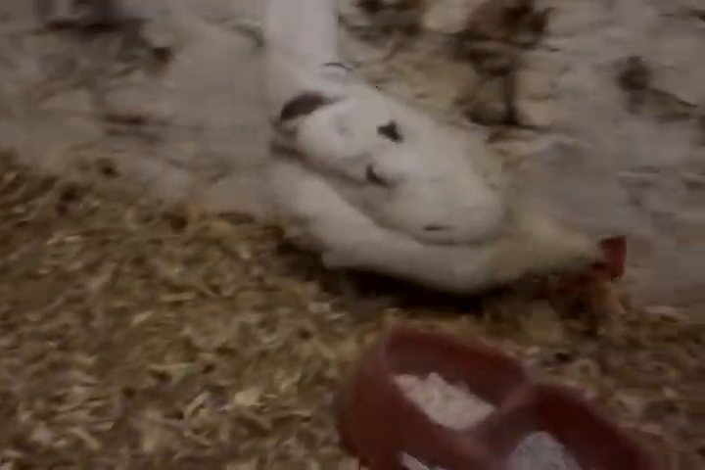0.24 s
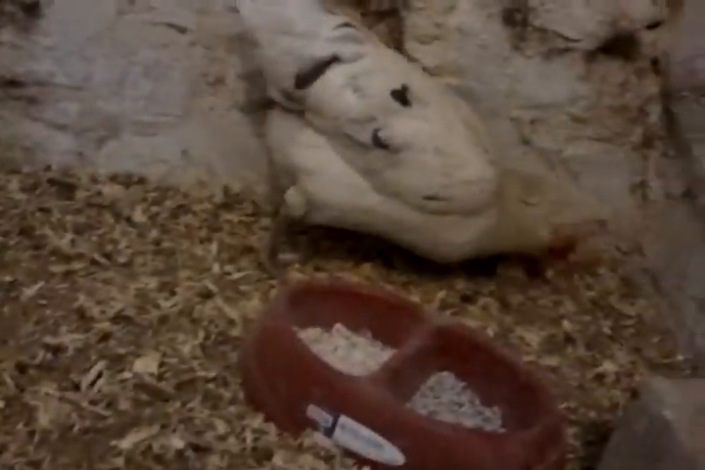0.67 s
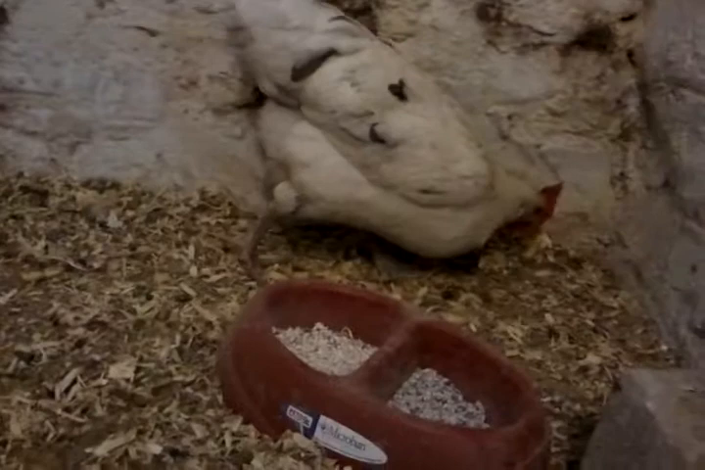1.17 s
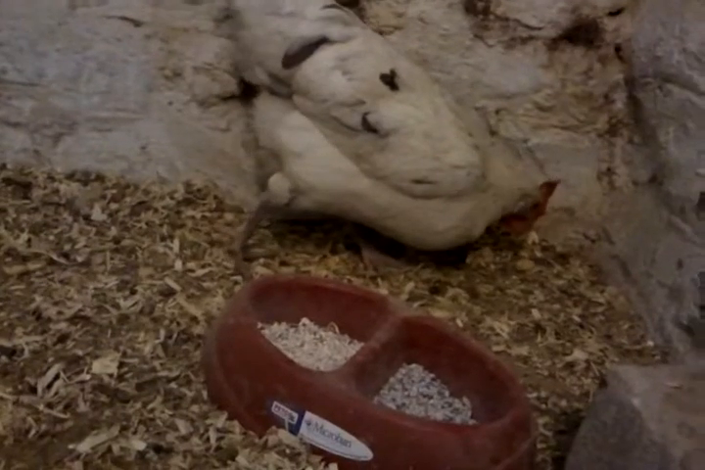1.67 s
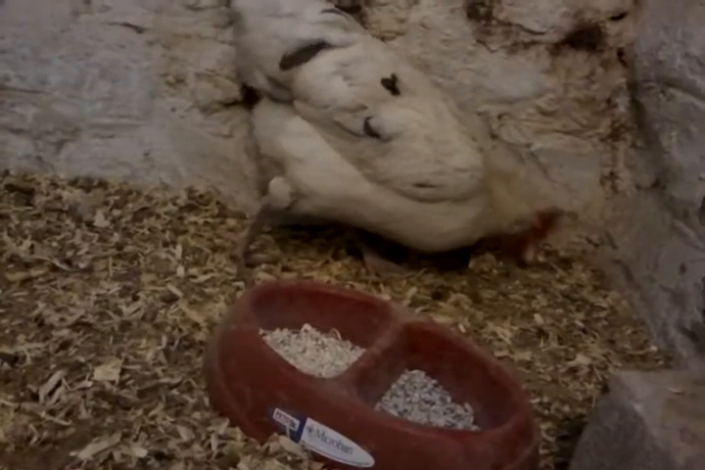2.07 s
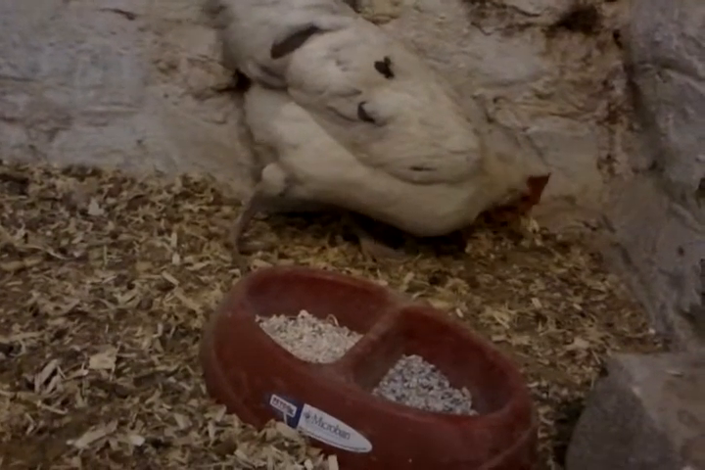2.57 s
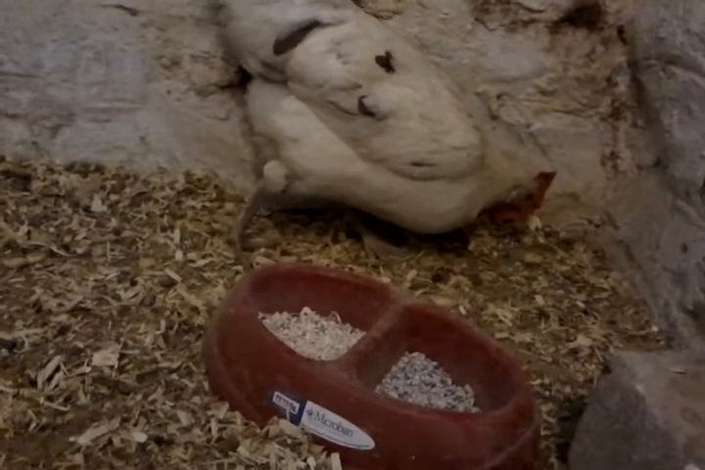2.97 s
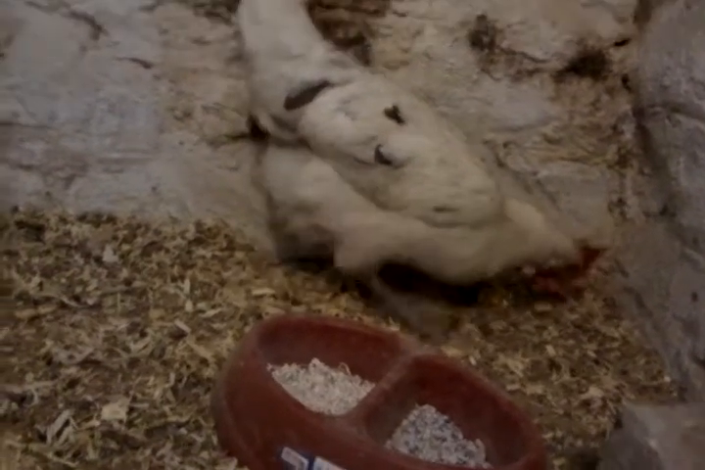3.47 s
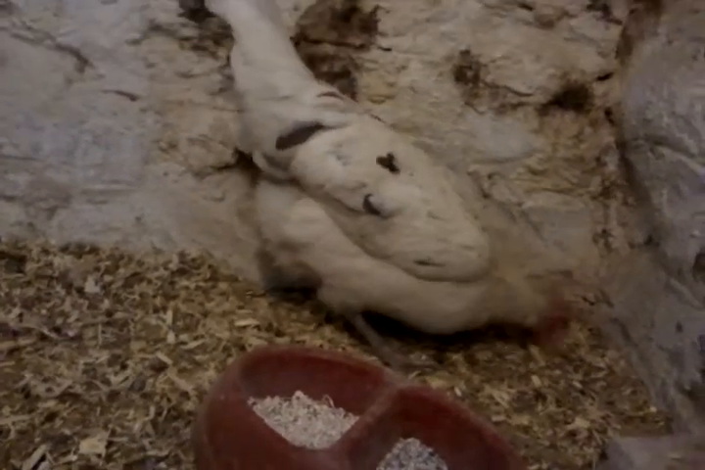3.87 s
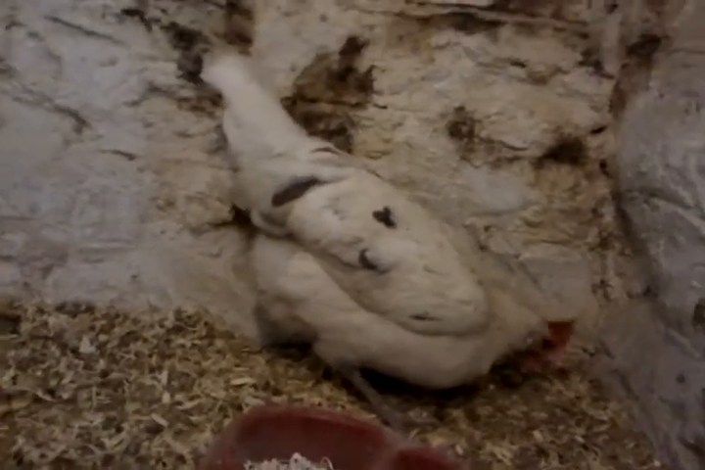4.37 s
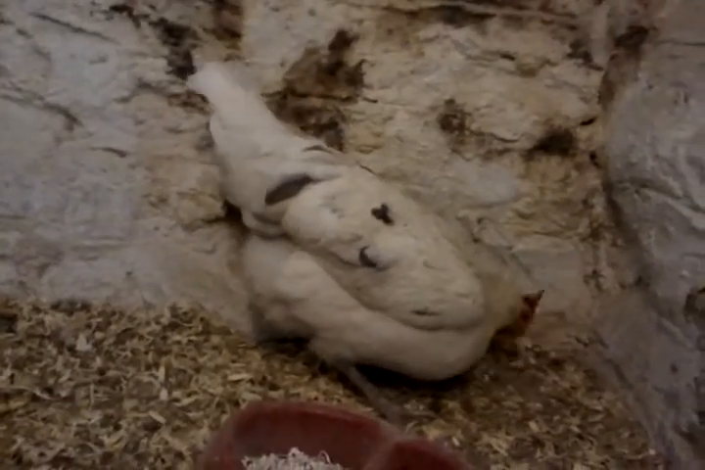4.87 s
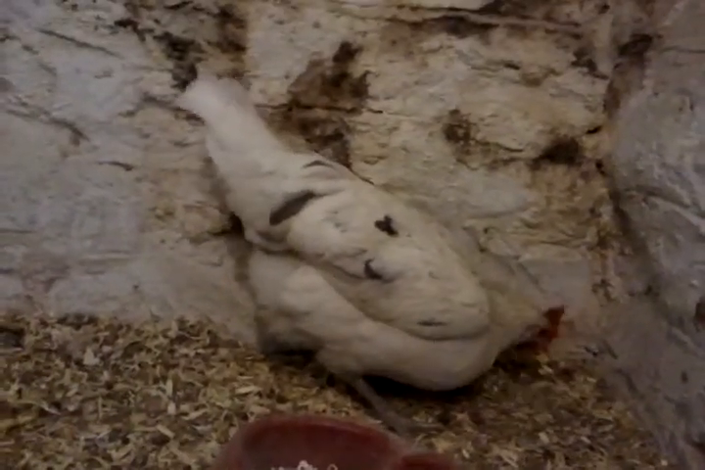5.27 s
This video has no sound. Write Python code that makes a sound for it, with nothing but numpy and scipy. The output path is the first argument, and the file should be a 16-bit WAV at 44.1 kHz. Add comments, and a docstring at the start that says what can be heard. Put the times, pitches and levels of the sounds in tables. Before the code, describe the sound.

A hen pecks at food in a small stone coop, sharp bright beak clicks in quick irregular clusters with dry litter crunches and short echoes.

```python
"""Beak clicks come in quick clusters: a hen pecks at nuts in a small stone coop, close to a camera.
Each click is three short rings and a broader crack, and the walls answer it with echoes and a tail.
Dry litter crunches in dense grains under the beak; some moments add a dull thud or a hollow knock.
Below lie a low outdoor rumble of shaped noise and a wavering hum that swells.
The camera adds shaped hiss, a faint tick at a fixed pace and, at times, a thin whine of three tones."""
import sys
import numpy as np
from scipy import signal
from scipy.fft import rfft, irfft, next_fast_len
from scipy.io import wavfile
from scipy.ndimage import uniform_filter1d, map_coordinates

SR = 44100
rng = np.random.default_rng(int(sys.argv[2]) if len(sys.argv) > 2 else 0)


def amplitude_ratio(level_db):
    """Convert a level in decibels to the matching linear amplitude (field) ratio."""
    exponent = np.asarray(level_db, float) / 20
    return 10 ** exponent


def store_pcm(level_fs):
    """Save levels as 16-bit WAV."""
    pcm = np.round(np.clip(level_fs, -1, 1) * 32767).astype(np.int16)
    wavfile.write(sys.argv[1], SR, np.atleast_2d(pcm).T)


N = 244314  # length in samples


def unit(x):
    """Scales a sound to rms 1."""
    return x / np.sqrt(np.mean(x ** 2) + 1e-20)


def along(points, hz):
    """Reads a curve of (Hz, value) points on a log frequency axis."""
    f, v = np.transpose(points)
    return np.interp(np.log(hz + 1), np.log(f + 1), v)


def wobble(rate):
    """A smooth random curve with rate knots a second."""
    knots = rng.standard_normal(int(N * rate / SR) + 4)
    return map_coordinates(knots, [np.arange(N) * rate / SR])


def coloured(x, spectrum):
    """Filters x through a curve of (Hz, dB) points."""
    m = next_fast_len(N + 8192)
    gain = amplitude_ratio(along(spectrum, np.fft.rfftfreq(m, 1 / SR)))
    return irfft(rfft(x, m) * gain, m)[..., :N]


def ring(hz, swell_s, phase, size):
    """A struck body's ring: its envelope swells smoothly to 1 over two swell times, then dies."""
    u = np.arange(size) / SR / swell_s
    envelope = (u / 2) ** 2 * np.exp(2 - u)
    return envelope * np.sin(2 * np.pi * hz * swell_s * u + phase)


def add(track, s, sound):
    """Mixes a sound into the track at time s."""
    part = track[round(s * SR):][:len(sound)]
    part += sound[:len(part)]


def pecks():
    """Every contact strikes three rings while the brittle shell breaks in a few quick steps."""
    # beak contacts, levels ahead of the mix below:
    # contact_s, mid_ring_db, mid_ring_hz, high_over_mid_db, low_over_mid_db
    contacts = [(0.0599, -36.5, 3050, -4, -2.5), (0.0685, -35.5, 3500, -3, -7.5),
                (0.0873, -47, 2900, -2.5, -3), (0.1489, -53, 2900, 7, 1.5), (0.1639, -35, 3570, -3, -7.5),
                (0.187, -30.5, 4200, 2, -13.5), (0.1959, -24, 3650, -2.5, -15.5),
                (0.2112, -16, 3660, 4, -24), (0.3545, -56.5, 4340, 7, 14.5), (0.402, -55.5, 3540, 9, 8),
                (0.6496, -28, 3160, -4, -14.5), (0.7621, -36.5, 4040, 3, -1),
                (0.7804, -30.5, 3820, 2.5, -6.5), (0.8616, -43, 4780, 8, -6), (0.895, -39.5, 4860, 5.5, -8),
                (0.905, -38, 4700, 9.5, -5), (0.9903, -53.5, 4700, 12, 7), (1.0114, -19.5, 3880, -3, -14),
                (1.0336, -24, 3430, 0, -9.5), (1.0431, -24.5, 3760, 2, -17), (1.1348, -40.5, 3650, 0.5, 6),
                (1.1612, -44.5, 4190, -1, -3), (1.27, -47.5, 4140, 0, -3), (1.375, -47.5, 3870, -3, -2),
                (1.3853, -43, 3960, 6.5, -3.5), (1.4177, -41, 3250, -9, -3.5),
                (2.0245, -40.5, 3970, -3.5, 6.5), (2.0358, -32, 3850, 4, -4.5),
                (2.0692, -31, 3700, -2.5, -9.5), (2.149, -27.5, 3350, 5, -2), (2.1859, -41.5, 4210, 4, 5),
                (2.2141, -42, 3670, -1.5, -5), (2.232, -36, 3800, 3.5, -1.5),
                (2.2433, -35.5, 4750, 5, -1.5), (2.2472, -26.5, 3900, -3.5, -12),
                (2.2506, -33, 4090, -1, -7), (2.395, -31.5, 3920, -2, -7), (2.4036, -35.5, 3750, -2, -4),
                (2.4212, -36, 3800, 2.5, -6.5), (2.4344, -27.5, 4170, -5.5, -13),
                (2.4421, -17, 4150, 2.5, -23), (2.507, -47, 4780, 22, -1), (2.5102, -32, 4560, 10.5, -7),
                (2.5218, -31.5, 4280, 3.5, 1), (2.5389, -24.5, 3890, -8.5, -13.5),
                (2.785, -41.5, 4090, 3, -7), (2.7975, -37, 4030, 0.5, -11.5),
                (2.9233, -39, 4040, 0.5, -4.5), (2.9303, -35, 3920, -12, -11.5),
                (3.9633, -37, 4110, -9, -9.5), (3.977, -21.5, 4320, -6, -11),
                (3.9947, -21, 4130, -3.5, -11), (4.0666, -30, 3770, 7.5, -0.5),
                (4.1181, -41, 4740, -0.5, -5), (4.1695, -40.5, 3880, 0.5, -6), (4.7973, -30, 3760, 8.5, -7),
                (4.8203, -21.5, 3750, 4.5, -11), (4.895, -27, 4420, 5.5, -6), (4.9924, -44.5, 3900, 5, 2),
                (5.0096, -34, 4000, 5, -7.5), (5.0817, -53, 4780, 12.5, -7),
                (5.1385, -15.5, 3990, -5.5, -17), (5.2325, -31, 3700, 2, -18), (5.2904, -36.5, 4180, 5, 3),
                (5.3459, -40, 4080, 7, 2.5), (5.5258, -35.5, 4030, 6.5, -4)]
    # swell times of the low, middle and high ring: swell_s
    swell_times = [0.00032, 0.00057, 0.00035]
    # the high ring moves as the hen turns from nut to nut: time_s, centre_hz
    high_ring = [(.06, 5170), (.21, 5640), (.65, 5170), (.9, 5300), (1.02, 5740), (1.4, 5180), (2.0, 5850),
                 (2.55, 5530), (2.95, 5310), (4.0, 5290), (4.9, 5130), (5.01, 5470), (5.5, 5830)]
    snap_share = 1.1  # the clean rings beside the crack
    blur = 0.38  # swell time of the crack over that of the snap
    break_s = 0.002  # the steps of the breaking shell fall within this time
    lead_s = 0.0006  # the rings start ahead of the listed contact
    out = np.zeros(N)
    for s, mid_db, mid_hz, high_db, low_db in contacts:
        u = rng.random(12)
        low_hz = 1590 * (0.63 + 0.66 * u[3])
        high_hz = np.interp(s, *np.transpose(high_ring)) + 410 * (rng.random() - 0.5)
        levels_db = mid_db + low_db, mid_db, mid_db + high_db
        rings = list(zip((low_hz, mid_hz, high_hz), levels_db, swell_times, 2 * np.pi * u))
        snap = sum(amplitude_ratio(db) * ring(hz, swell, p, size=400) for hz, db, swell, p in rings)
        # summed over all directions the rings blur: a briefer, broader crack, which the walls hear too
        crack = sum(amplitude_ratio(db) * ring(hz, blur * swell, p, size=400) for hz, db, swell, p in rings)
        step_at = (u[4:8] * break_s * SR).astype(int)
        steps = np.bincount(step_at, 0.5 * np.sign(u[8:] - 0.5))
        add(out, s - lead_s, snap_share * snap)
        add(out, s - lead_s, np.convolve(crack, steps))
        add(out, s - lead_s, walls(crack, wet_db=1))
    return out


def litter():
    """Dry chips snap against each other: dense grains of a few cycles under a quick swell."""
    # litter pushed aside, level ahead of the walls' answer: start_s, length_s, rms_db, grain_hz
    crunches = [(0.06, 0.022, -47.5, 3560), (0.162, 0.01, -40.5, 3830), (0.17, .035, -54.5, 4060),
                (0.293, 0.25, -62.5, 4770), (0.757, .04, -40, 4870), (0.89, 0.031, -42.5, 4040),
                (1.007, 0.043, -33.5, 3920), (1.124, 0.047, -53, 3860), (1.261, .03, -54.5, 3540),
                (1.399, 0.035, -58.5, 3100), (2.017, 0.032, -44.5, 3850), (2.146, 0.032, -39.5, 4270),
                (2.218, 0.067, -51, 4080), (2.389, 0.1, -50, 4300), (2.504, 0.061, -44, 4730),
                (3.396, 0.11, -70.5, 5360), (3.609, 0.032, -61.5, 5000), (3.682, 0.071, -71.5, 5000),
                (3.958, .05, -42.5, 3900), (4.061, 0.023, -37.5, 4700), (4.787, 0.018, -51, 4740),
                (4.891, 0.042, -42.5, 5040), (5.06, 0.017, -57, 5640), (5.1332, 0.012, -33.5, 4250),
                (5.513, 0.027, -54.5, 4650)]
    grains_per_s, grain_spread_db = 2500, 4
    out, t = np.zeros(N), np.arange(90) / SR
    for s, length, db, hz in crunches:
        u = rng.standard_normal((int(grains_per_s * length), 3))
        when = rng.beta(1.3, 1.6, size=len(u)) * length
        pitch = np.clip(hz * np.exp(0.26 * u[:, :1]), 400, 9000)
        decay = np.exp(-t * pitch / 2.5)  # 2.5 cycles to fall by e
        grains = amplitude_ratio(grain_spread_db * u[:, 1:2]) * decay * np.sin(2 * np.pi * pitch * t)
        at = (when * SR).astype(int)[:, None] + np.arange(len(t))
        crunch = amplitude_ratio(db) * unit(np.bincount(at.ravel(), grains.ravel()))
        add(out, s, crunch)
        add(out, s, walls(crunch, wet_db=-3.0))
    return out


def low_pushes():
    """Short low pushes: dull thuds near 155-205 Hz and hollow knocks near 490-880 Hz."""
    # thuds and knocks, level ahead of the walls' answer: start_s, envelope_peak_db, push_hz
    pushes = [(0.777, -41.5, 205), (1.015, -40.5, 200), (1.032, -35, 882), (1.527, -51, 620),
              (3.98, -39.5, 745), (4.071, -51, 493), (2.145, -45, 179), (2.52, -41, 155),
              (4.896, -53.5, 162), (5.135, -44, 165)]
    out = np.zeros(N)
    for s, db, hz in pushes:
        push = amplitude_ratio(db) * ring(hz, 0.62 / hz, 0, size=2500)  # dies within a few cycles
        add(out, s, push)
        add(out, s, walls(push, wet_db=-6.5))
    return out


def walls(sound, wet_db):
    """The stone walls' answer: a near gap, eight early echoes and a noise tail dying by band."""
    # decay of the coop: band_hz, t60_s
    decay = [(200, 0.25), (800, 0.36), (2000, 0.27), (4000, 0.18), (6000, 0.18), (7500, 0.14), (9000, 0.13)]
    hz, t, z = signal.stft(rng.standard_normal(SR // 3), SR, nperseg=256)
    fall = amplitude_ratio(-60 * t / along(decay, hz)[:, None])
    tail = signal.istft(z * fall, SR, nperseg=256)[1]
    t = np.arange(len(tail)) / SR
    # the nearest wall is a metre off: the tail is weak at first and full from 7 ms
    tail *= np.interp(t, [0.0035, 0.007], [0.2, 1])
    # rough stone scatters in clumps
    clumps = unit(uniform_filter1d(rng.standard_normal(len(t)), size=90))
    tail *= amplitude_ratio(3.0 * clumps)
    tail /= np.linalg.norm(tail)
    u = rng.random((8, 2))
    delay_s = 0.0099 + 0.11 * u[:, 0]
    echoes = amplitude_ratio(-9 - 460 * delay_s) * np.sign(u[:, 1] - 0.5)  # later echoes are weaker
    tail[(delay_s * SR).astype(int)] += echoes
    return amplitude_ratio(wet_db) * signal.fftconvolve(sound, tail)


def rumble():
    """Low outdoor rumble of shaped noise, and a narrow hum that wavers at rest, swells and fades."""
    # rumble level before its random wander: time_s, rms_db
    levels = [(0, -60.5), (1.3, -59.5), (2, -61), (2.67, -61.5), (3, -60), (4, -61), (5, -54),
              (5.54, -52.5)]
    # relative density of the rumble: freq_hz, density_db_per_hz
    lows = [(10, -19), (20, -22), (30, -1), (45, -9.5), (60, -5.5), (75, -18), (120, -6.5), (155, -13),
            (207, -3), (290, -22.5), (500, -23), (900, -66)]
    # swells of the hum before their waver: start_s, end_s, peak_db
    hum_swells = [(0.946, 1.034, -67), (1.74, 1.79, -72), (2.14, 2.2, -74), (2.658, 2.727, -55),
                  (3.34, 3.96, -53.5), (4.08, 4.15, -58), (4.28, 4.406, -62.5), (4.704, 4.853, -58),
                  (5.28, 5.497, -56.5)]
    hum_hz, rest_db, waver_db, fade_db_per_s = 88, -65, 5, 160
    t = np.arange(N) / SR
    low_db = np.interp(t, *np.transpose(levels)) + 2.4 * wobble(3.04)
    low = amplitude_ratio(low_db) * unit(coloured(rng.standard_normal(N), lows))
    hum = np.sin(2 * np.pi * np.cumsum(hum_hz + 2.0 * wobble(14)) / SR)
    swells = np.zeros(N)
    for start, end, db in hum_swells:
        outside_s = np.maximum(0, np.maximum(start - t, t - end))
        swells += amplitude_ratio(db - fade_db_per_s * outside_s)
    hum_level = amplitude_ratio(rest_db + waver_db * wobble(9)) + amplitude_ratio(1.5 * wobble(6)) * swells
    return low + hum_level * hum


def camera():
    """The camera's own noise: hiss, a tick at a fixed pace and thin tones that come and go."""
    # relative density of the hiss: freq_hz, density_db_per_hz
    hiss_colour = [(180, -28.5), (300, -4), (376, -5), (498, -9), (689, -8), (750, -8.5), (863, -11),
                   (2010, -16.5), (6300, -20.5), (8710, -49), (11300, -81), (19200, -120)]
    # the tick is duller than the clicks: freq_hz, gain_db
    tick_colour = [(6000, 1), (7200, -5), (8000, -45)]
    # spells of the whine, level at the onset before smoothing and waver: start_s, end_s, onset_db
    whine_spells = [(0, .16, -70), (1.07, 1.57, -59), (1.92, 2.02, -63), (3.25, 3.5, -72), (3.6, 3.78, -71),
                    (4.58, 4.78, -71)]
    # tones of the whine: tone_hz, relative_db
    whine_tones = [(3170, -7), (5346, 0), (7050, -13)]
    first_tick_s, tick_every_s, tick_db = 0.0127, 0.040989, -41  # level ahead of tick_colour
    whine_fade_db_per_s = 30
    t = np.arange(N) / SR
    hiss = amplitude_ratio(-64.5 + 0.4 * wobble(5.6)) * unit(coloured(rng.standard_normal(N), hiss_colour))
    ticks = np.zeros(N)
    tick_times = np.arange(first_tick_s, t[-1], tick_every_s)
    ticks[np.round(tick_times * SR).astype(int)] = -amplitude_ratio(tick_db)
    drift = 2 * np.pi * np.cumsum(1 + 0.003 * wobble(8)) / SR  # shared by the three tones
    spells = np.zeros(N)
    for start, end, db in whine_spells:
        spells += amplitude_ratio(db - whine_fade_db_per_s * (t - start)) * ((t > start) & (t < end))
    spells = uniform_filter1d(spells, size=1500)  # soft edges
    tones = sum(amplitude_ratio(db) * np.sin(hz * drift) for hz, db in whine_tones)
    whine = amplitude_ratio(2.5 * wobble(30)) * spells * tones
    return hiss + coloured(ticks, tick_colour) + whine


def scene():
    """All sources in the coop and the camera, mono."""
    return (pecks() + litter() + low_pushes() + rumble() + camera())[None]


def top_cut(x):
    """Nothing passes above the cut-off."""
    return signal.sosfilt(signal.butter(12, 8860, fs=SR, output="sos"), x)


def record(dry):
    """The camera's microphone lifts the treble a little, then rolls it off; a constant offset is added."""
    # microphone response: freq_hz, gain_db
    mic = [(20, -0.5), (6500, 1), (7500, 3.5), (8200, -8), (8800, -10), (9600, -81.5)]
    offset = -0.041  # of full scale
    mix = coloured(dry, mic) + offset
    return top_cut(mix)


dry = scene()
out = record(dry)
store_pcm(out)
```